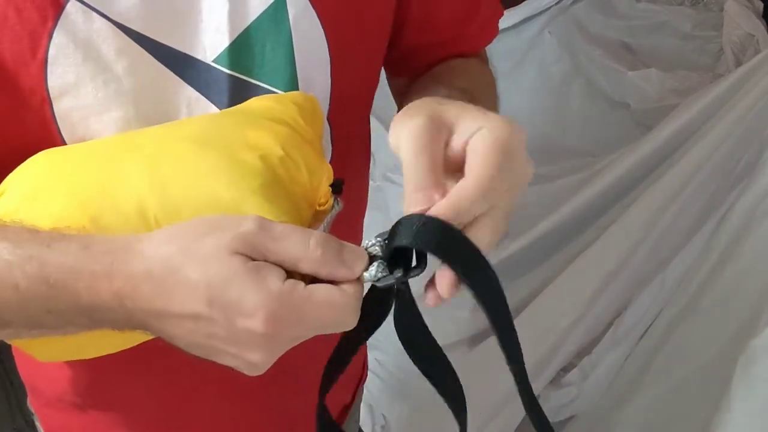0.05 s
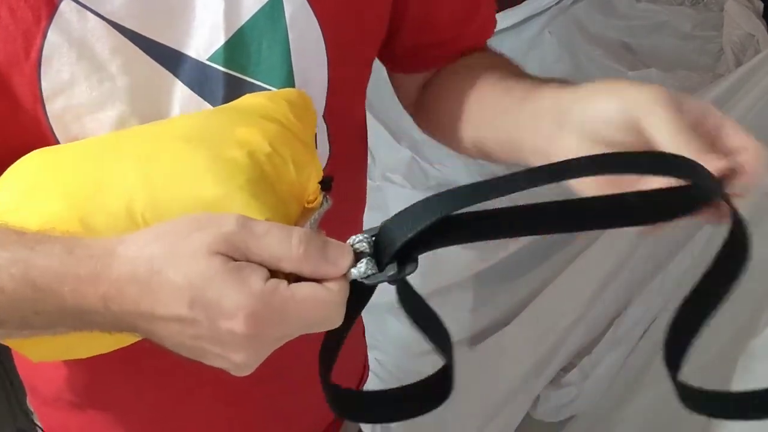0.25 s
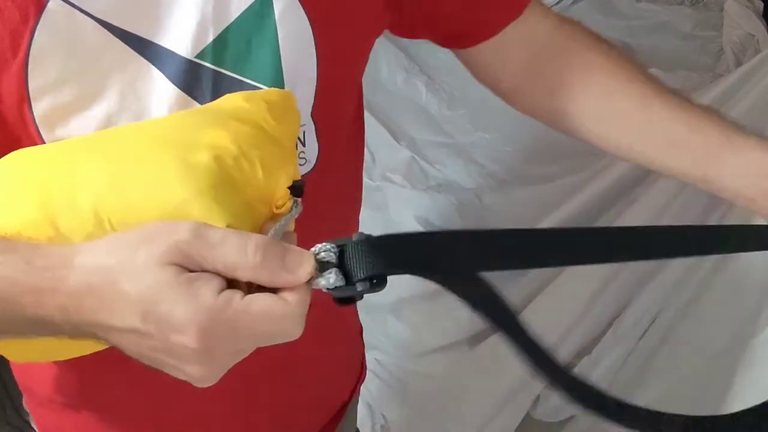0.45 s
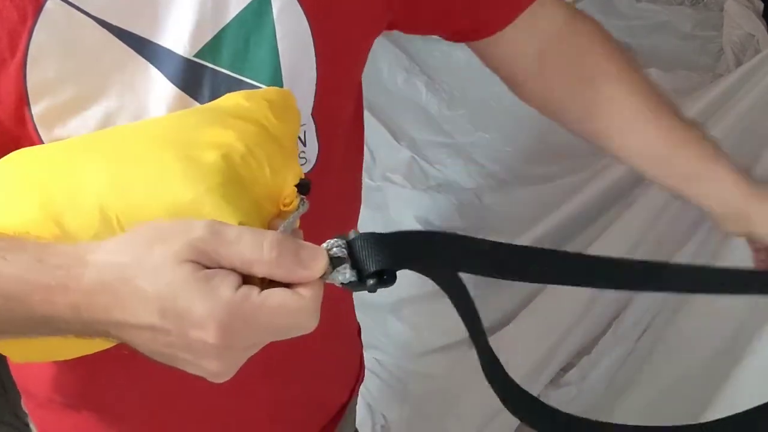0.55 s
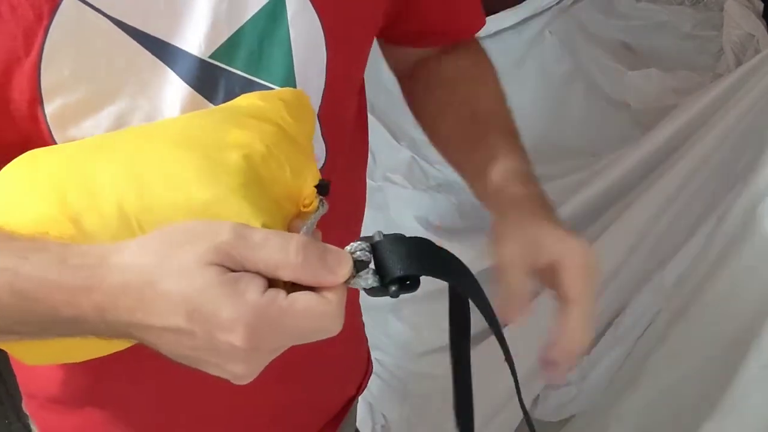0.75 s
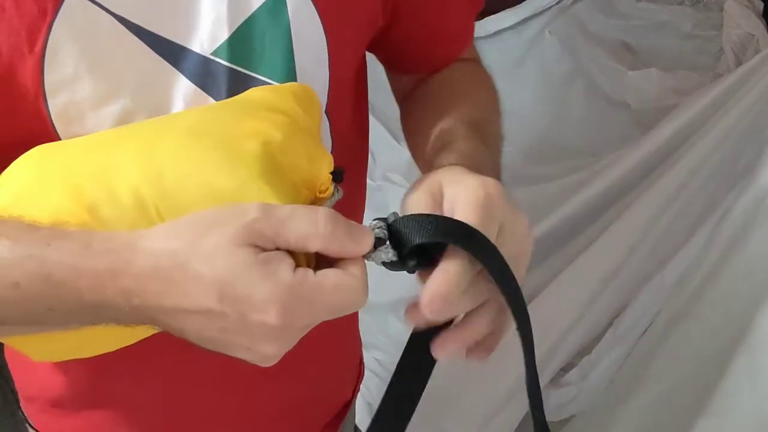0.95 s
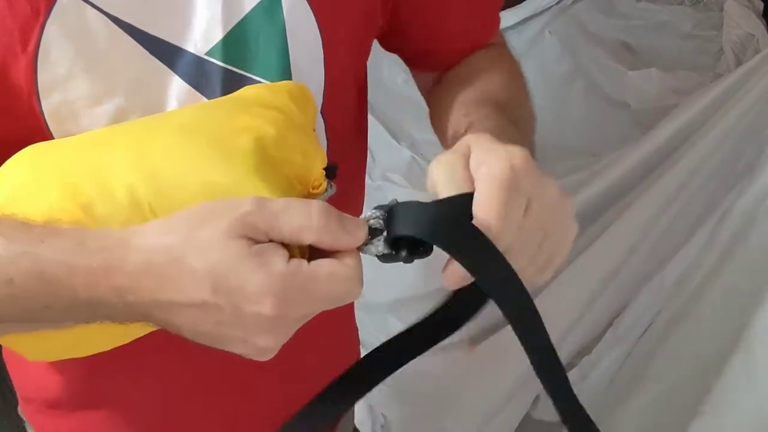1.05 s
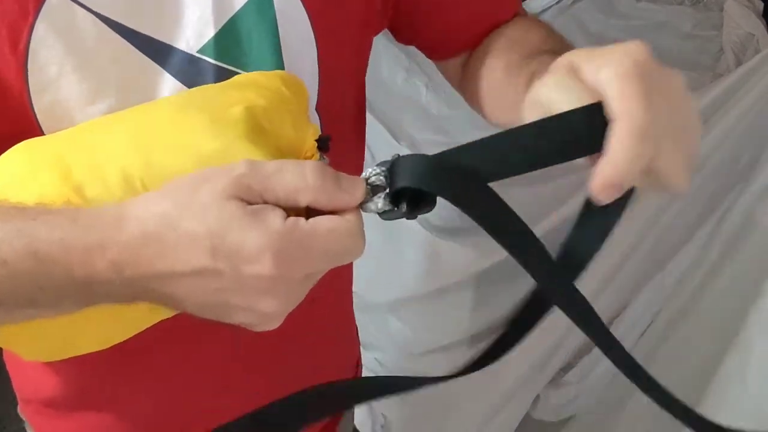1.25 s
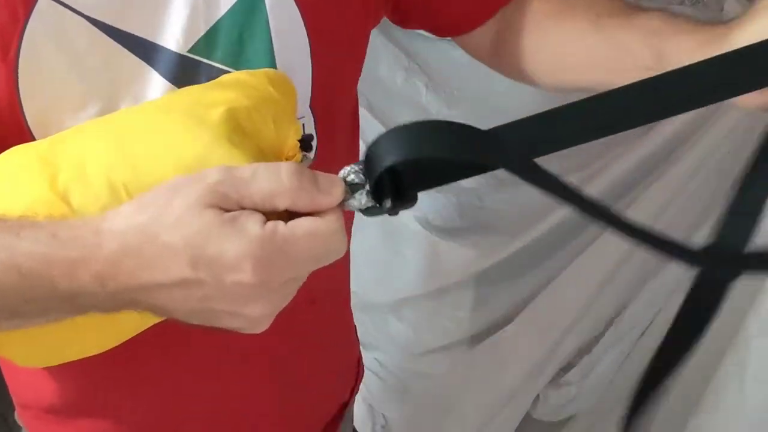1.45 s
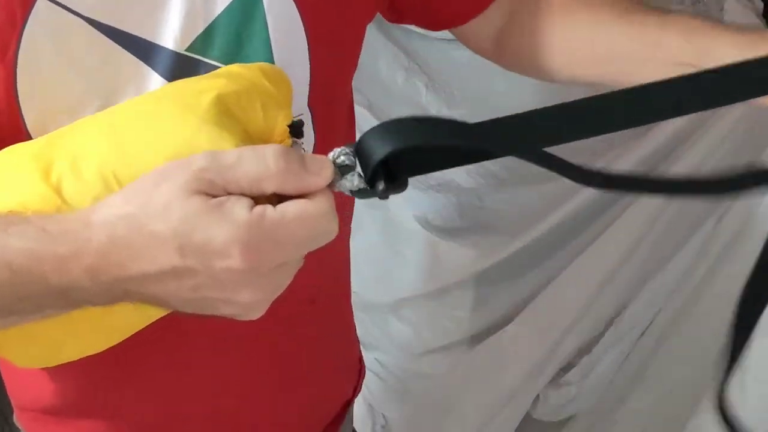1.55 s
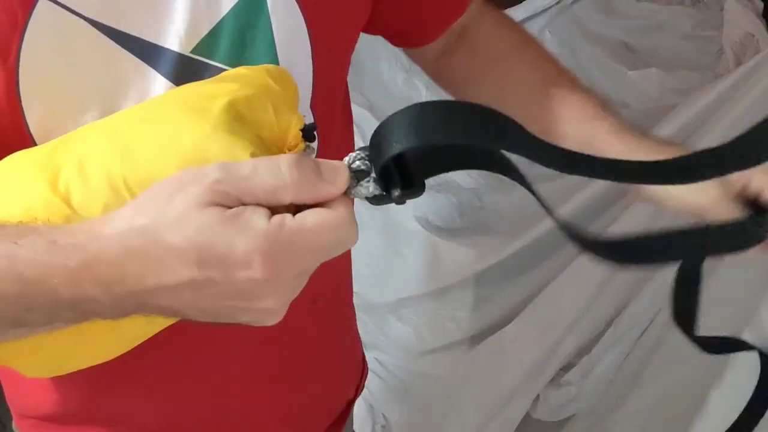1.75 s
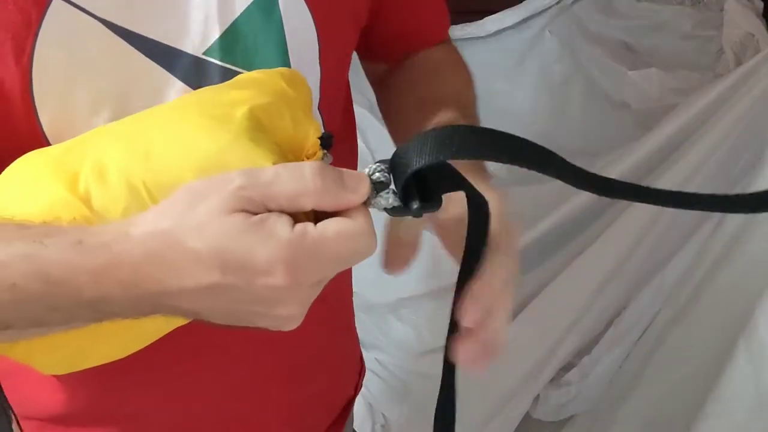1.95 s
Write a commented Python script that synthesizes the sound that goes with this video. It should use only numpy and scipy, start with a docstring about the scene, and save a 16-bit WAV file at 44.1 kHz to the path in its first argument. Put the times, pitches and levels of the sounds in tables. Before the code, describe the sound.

Close up in a quiet room, a nylon strap zips quickly through a metal buckle, ending in a sharp metallic snap. After a light rustle, a second pull buzzes lower until the strap cracks taut and flaps slack.

```python
"""Nylon webbing is pulled twice through a metal cam buckle, close by in a quiet room.
After light handling ticks, the ribs of the weave buzz over the cam at a pitch that follows the hand's
speed, while the fibres hiss. Near 0.6 s the buckle chatters, snaps shut and rings. Cloth rustles as the
hand takes a new grip. From 1.2 s a slower pull buzzes lower, ending near 1.65 s in a crack, a dull tug
and a flap of slack strap."""
import sys
import numpy as np
from scipy import signal
from scipy.fft import rfft, irfft, next_fast_len
from scipy.io import wavfile
from scipy.ndimage import uniform_filter1d, map_coordinates

SR = 44100
rng = np.random.default_rng(int(sys.argv[2]) if len(sys.argv) > 2 else 0)


def digitize_waveform(pressure):
    """Quantize a signal to 16-bit integers and store it at the path in sys.argv[1].

    Rows of a 2-D input are taken as channels; values are limited to [-1, 1].
    """
    field = np.atleast_2d(pressure).T
    bounded = np.clip(field, -1, 1)
    quanta = np.round(bounded * 32767).astype(np.int16)
    wavfile.write(sys.argv[1], SR, quanta)


N = 88200
T = np.arange(N) / SR

# room rumble, and its side channel relative to the mid (frequency [Hz], level [dB])
RUMBLE_COLOUR = [(25, -48), (45, -11.5), (60, -11.5), (100, -0.5), (150, -8), (380, -20.5), (700, -19.5),
                 (950, -27), (3000, -33), (9000, -51)]
RUMBLE_SIDE = [(60, -36), (130, -5), (300, -12), (2000, 0.5)]
# reverberation time (frequency [Hz], t60 [s])
ROOM_DECAY = [(200, 0.2), (14000, 0.074)]

# handling ticks, rustle envelope and flaps of slack strap (time [s], relative level [dB])
TICKS = [(0.07, -45), (.1213, -43), (0.1344, -39), (0.675, -44), (0.9627, -33), (1.058, -47.5)]
RUSTLE = [(0, -79), (.12, -68.5), (.62, -61.5), (.72, -78), (.89, -76), (.95, -63), (1.04, -67),
          (1.08, -61.5), (1.9, -65.5), (2, -68.5)]
FLAPS = [(.563, -41), (1.667, -41), (1.678, -37), (1.69, -36), (1.716, -36), (1.75, -41.5)]
# their spectra (frequency [Hz], level [dB])
TICK_COLOUR = [(1000, -15), (1700, 4), (4700, 6), (7400, 4.5), (9500, -7), (15800, -9)]
RUSTLE_COLOUR = [(400, -14), (2000, 4.5), (4000, 4.5), (10000, -2.5), (13500, 1), (15800, -8)]
FLAP_COLOUR = [(40, -21), (100, 5.5), (270, 2), (420, -11.5), (8000, -68)]
# the strap cracking taut, shuddering and scraping when slack (frequency [Hz], level [dB])
CRACK_COLOUR = [(800, -18), (1550, -2), (2380, -7), (3050, 5.5), (3600, -14), (4200, 6), (4700, -10),
                (15800, -45)]
TUG_COLOUR = [(200, -15), (950, -5), (1300, 6), (3150, -6), (3600, -17), (15800, -35)]
SLACK_COLOUR = [(100, -42), (270, 5.5), (480, -12), (740, 10.5), (1100, 0), (3000, -23)]
# fibres snagging on the cam (time [s], level [dB])
SNAGS = [(.16, -52), (0.2332, -42.5), (0.2743, -38.5), (0.532, -44.5)]

# modes of the steel buckle (frequency [Hz], level [dB], t60 [s])
STEEL_MODES = [(5280, 1, 0.099), (5529, -9, 0.097), (6130, -13, 0.15), (6982, 4, .16), (7290, 13.5, 0.11),
               (7850, -7, .17), (12100, -9, 0.087)]
# the cam's impacts (time [s], level [dB], loss above 6 kHz [dB/octave])
SNAPS = [(0.5784, -35, -5), (0.5874, -3.5, -0.5), (0.5905, -14.5, 0), (0.5925, -14.5, 1), (0.596, -17.5, 4)]
# envelope of the loose cam's rattle (time [s], level [dB])
CHATTER = [(.52, -68), (.544, -45), (.57, -45.5), (.59, -40), (.615, -59), (.635, -61), (.66, -77)]
# spectra of impact and rattle (frequency [Hz], level [dB])
SNAP_COLOUR = [(200, -37), (1800, -11), (3600, -17), (4600, -2.5), (5500, 4.5), (7400, 1.5), (8900, -13),
               (10500, -3), (11800, 3), (13500, -5.5), (15800, -6)]
CHATTER_COLOUR = [(1000, -37), (4000, -6.5), (6200, 1.5), (7700, -2.5), (8800, -14), (15800, -5)]

# speed of each pull (time [s], rib rate [Hz])
RIB_RATE_1 = [(.14, 205), (.2, 321), (.24, 444), (.265, 440), (.28, 593), (.305, 590), (.385, 850),
              (.407, 1000), (.425, 903), (.455, 995), (.5, 970), (.53, 655), (.555, 354), (.585, 232)]
RIB_RATE_2 = [(1.2, 114.6), (1.28, 246), (1.31, 349.8), (1.345, 396.7), (1.37, 526), (1.386, 504.4),
              (1.408, 549), (1.428, 501.7), (1.458, 497), (1.475, 424.4), (1.53, 484.4), (1.55, 575.5),
              (1.58, 526.7), (1.612, 445.8), (1.635, 290.3), (1.665, 176.3), (1.7, 99.3)]
# envelopes of each pull (time [s], relative buzz level [dB], relative hiss level [dB])
LEVELS_1 = [(0.101, -103, -64.5), (.16, -59, -68), (.215, -57, -55.5), (.238, -49.5, -55.5),
            (.262, -51.5, -51.5), (0.286, -46, -48.5), (.32, -44, -49.5), (0.383, -50, -52.5),
            (0.404, -43.5, -49.5), (0.424, -39.5, -43.5), (0.446, -50.5, -33), (.475, -47.5, -47.5),
            (0.509, -52, -53.5), (.535, -45.5, -59), (0.584, -45, -46), (.61, -94, -72)]
LEVELS_2 = [(1.15, -65.5, -74.5), (1.215, -63.5, -58), (1.262, -52.5, -55.5), (1.295, -52, -49.5),
            (1.32, -47.5, -51), (1.36, -44.5, -48), (1.37, -38, -47), (1.408, -38.5, -49.5),
            (1.428, -41, -48.5), (1.448, -36.5, -49.5), (1.472, -42.5, -50), (1.54, -41.5, -52.5),
            (1.555, -40.5, -49.5), (1.625, -42, -52), (1.641, -36.5, -56), (1.668, -42.5, -83),
            (1.731, -91, -91)]
# partials of the buzz (frequency [multiple of rib rate], level [dB])
PARTIALS_1 = [(1, 1.5), (1.5, -5.5), (2, 4), (2.5, -5), (3, -2), (3.5, -9), (4, -2), (6, -3.5)]
PARTIALS_2 = [(.5, -14.5), (1, -0.5), (1.5, -11), (2, 3), (3, 2), (4, -5), (5, -6)]
# spectra of rib rasp and fibre hiss (frequency [Hz], level [dB])
RASP_1 = [(150, -7), (400, -4.5), (540, -17), (700, -6), (1000, -11), (1180, -1.5), (1600, -0.5),
          (2550, -4.5), (3000, -1.5), (4000, -6), (4700, -14), (8000, -14.5), (15000, -23)]
RASP_2 = [(100, -9), (300, 1.5), (510, -2), (610, -6.5), (760, 4), (900, -7.5), (1200, -6), (1550, 2.5),
          (2000, -4.5), (2700, -2), (4200, -13.5), (5500, -26), (15000, -39)]
HISS_1 = [(500, -25), (2500, 0.5), (4200, 7), (5800, 9.5), (7400, -4), (9000, -7), (12000, -5.5),
          (15800, -9)]
HISS_2 = [(500, -19), (2500, -6.5), (4300, 6.5), (5800, -1), (7300, -2), (9000, -9.5), (13000, -6.5),
          (15800, -6.5)]
# at speed the ribs catch evenly and the tone gains on the rasp (start [s], end [s], lift [dB])
EVEN_1 = (0.382, 0.477, 5.1)
EVEN_2 = (1.364, 1.463, 4.96)


def amp(db):
    """Amplitude ratio of a level in decibels."""
    return 10 ** (np.asarray(db) / 20)


def unit(x):
    """Normalisation to rms 1."""
    return x / np.sqrt(np.mean(x ** 2) + 1e-20)


def along(points, hz):
    """Interpolation on a logarithmic frequency axis."""
    f, values = np.transpose(points)
    return np.interp(np.log(hz + 1), np.log(f + 1), values)


def curves(rows):
    """Linear interpolation in time, one curve per value column."""
    times, *columns = np.transpose(rows)
    return [np.interp(T, times, column) for column in columns]


def wobble(rate):
    """Smooth random modulation, rate knots a second."""
    return map_coordinates(rng.standard_normal(8000), [T * rate], mode="wrap")


def filtered(x, response):
    """Filtering as multiplication of the spectrum by a frequency response."""
    size = next_fast_len(N + SR // 2)
    return irfft(rfft(x, size) * response(np.fft.rfftfreq(size, 1 / SR)), size)[..., :N]


def impulse(colour, size=2048):
    """Minimum-phase impulse response of energy 1, from the folded cepstrum."""
    cepstrum = irfft(np.log(amp(along(colour, np.fft.rfftfreq(size, 1 / SR)))))
    cepstrum[1:size // 2] *= 2
    cepstrum[size // 2 + 1:] = 0
    response = irfft(np.exp(rfft(cepstrum)))
    return response / np.linalg.norm(response)


def coloured(x, colour):
    """Convolution with a causal filter of the given spectrum."""
    return signal.fftconvolve(x, impulse(colour))[:N]


def grains(colour, spiky_db):
    """Friction noise of rms 1: many tiny slips of uneven size."""
    return unit(coloured(rng.standard_normal(N) * amp(spiky_db * wobble(1500)), colour))


def contact(s, colour, scuff, scuff_s):
    """Impact excitation: a sharp push and a short scuff, with the energy of a clean tick of peak 1."""
    age = np.maximum(T - s, 0)
    force = scuff * rng.standard_normal(N) * (age > 0) * np.exp(-age / scuff_s)
    force[round(s * SR)] += 1
    sound = coloured(force, colour)
    return sound / np.linalg.norm(sound) / np.abs(impulse(colour)).max()


def jerk(s, rise_s, fall_s):
    """Transient envelope of peak 1: quick rise, exponential decay."""
    age = np.maximum(T - s, 0)
    shape = (1 - np.exp(-(age / rise_s) ** 2)) * np.exp(-age / fall_s)
    return shape / shape.max()


def placed(x, lead_s, pan_db):
    """Time and level differences: the sound reaches the left channel earlier, and louder by pan_db."""
    sign = np.array([[1], [-1]])
    return filtered(x, lambda f: np.exp(1j * np.pi * f * lead_s * sign)) * amp(sign * pan_db / 2)


def background(rumble_db=-54, hum_hz=86, hum_db=-61.5):
    """Ambient noise: partly coherent room rumble and a faint hum wavering by phase modulation."""
    mid, side = filtered(rng.standard_normal((2, N)), lambda f: amp(along(RUMBLE_COLOUR, f)))
    side = filtered(side, lambda f: amp(along(RUMBLE_SIDE, f)))
    hum = np.sqrt(2) * np.sin(2 * np.pi * hum_hz * T + 0.69 * wobble(9.6))
    return amp(rumble_db) * unit(np.array([mid + side, mid - side])) + amp(hum_db) * hum


def reflections(x, wet_db, near_db, near_s):
    """Early reflections off hands and body, then a furnished room's exponential tail, as mid and side."""
    hz, t, noise = signal.stft(rng.standard_normal((2, SR // 4)), SR, nperseg=256)
    decay = amp(-60 * t / along(ROOM_DECAY, hz)[:, None])
    tail = signal.istft(noise * decay, SR, nperseg=256)[1]
    near = rng.standard_normal(tail.shape) * np.exp(-T[:tail.shape[1]] / near_s)
    response = amp(wet_db) * tail / np.linalg.norm(tail[0])
    response += amp(near_db) * near / np.linalg.norm(near[0])
    delayed = np.pad(x, (30, 0))
    return signal.fftconvolve(delayed[None], response, axes=1)


def room(x, wet_db, near_db, near_s, coherent_below_hz=990):
    """Time-varying reverberation: the reflections keep changing as arm and strap move."""
    hop = SR // 14
    window = np.sin(np.pi * np.arange(2 * hop) / (2 * hop))
    x, wet = np.pad(x, (hop, 2 * hop)), np.zeros((2, N + SR))
    for i in range(0, N + hop, hop):
        part = reflections(x[i:i + 2 * hop] * window, wet_db, near_db, near_s)
        wet[:, i:i + part.shape[1]] += part
    mid, side = wet[:, hop:hop + N]
    side = filtered(side, lambda f: f / np.hypot(f, coherent_below_hz))
    return np.array([mid + side, mid - side]) / np.sqrt(2)


def handling():
    """Light impacts and friction: the buckle ticks and cloth rustles as the hand takes a grip."""
    ticks = sum(amp(db) * contact(s, TICK_COLOUR, scuff=0.38, scuff_s=0.0037) for s, db in TICKS)
    rustle = amp(curves(RUSTLE)[0]) * grains(RUSTLE_COLOUR, spiky_db=2)
    return amp(8) * ticks + rustle


def snags():
    """Stick and slip: snagged fibres tear free in short scratches."""
    envelope = sum(amp(db) * jerk(s, rise_s=0.0008, fall_s=0.006) for s, db in SNAGS)
    return envelope * grains(HISS_1, spiky_db=3.5)


def strap():
    """Tension transients: the strap cracks taut and shudders on the second pull, and flaps after both."""
    crack = amp(-24.5) * jerk(1.633, rise_s=0.0006, fall_s=0.0031) * grains(CRACK_COLOUR, spiky_db=-0.5)
    tug = amp(-34.5) * jerk(1.636, rise_s=0.002, fall_s=0.013) * grains(TUG_COLOUR, spiky_db=2)
    flaps = sum(amp(db) * contact(s, FLAP_COLOUR, scuff=0.039, scuff_s=0.026) for s, db in FLAPS)
    return crack + tug + flaps


def ringing(x, ring_db):
    """Modal resonance: the struck steel rings on as a sum of damped sinusoids."""
    t = T[:SR // 3]
    ring = sum(amp(db - 60 * t / t60) * np.sin(2 * np.pi * (hz * t + rng.random()))
               for hz, db, t60 in STEEL_MODES)
    return x + amp(ring_db) * signal.fftconvolve(x, ring / np.linalg.norm(ring))[:N]


def buckle():
    """Impacts excite the steel's modes as the cam rattles, snaps shut and bounces."""
    snaps = np.zeros(N)
    for s, db, loss in SNAPS:
        colour = [(hz, level - loss * np.log2(max(hz / 6000, 1))) for hz, level in SNAP_COLOUR]
        snaps += amp(db) * contact(s, colour, scuff=0.066, scuff_s=0.0015)
    rattle = amp(curves(CHATTER)[0]) * grains(CHATTER_COLOUR, spiky_db=1.5)
    return ringing(snaps + rattle, ring_db=-19)


def rib_clicks(ribs, rate, scatter):
    """A jittered impulse train: each rib catches on the cam with uneven timing and strength."""
    jitter, strength = rng.standard_normal((2000, 2))[:int(ribs[-1])].T
    samples = np.interp(np.arange(len(jitter)) + scatter * jitter, ribs, np.arange(N)).astype(int)
    clicks = np.bincount(samples, amp(2.54 * strength), N) / np.sqrt(rate / SR)
    return clicks - uniform_filter1d(clicks, size=600)


def pull(rib_rate, levels, even, partials, rasp_colour, hiss_colour,
         tone_db, rasp_db, hiss_db, slack_db, waver, flutter_db, scatter):
    """Periodic excitation: ribs crossing the cam buzz and rasp at their rate and modulate fibre hiss."""
    rate, = curves(rib_rate)
    buzz_db, fibre_db = curves(levels)
    start, end, lift_db = even
    even_db = lift_db * uniform_filter1d(1. * (T > start) * (T < end), size=600)
    ribs = np.cumsum(rate * (1 + waver * wobble(250))) / SR  # ribs passed so far
    # as the hand slows, the strap slackens and its buzz turns to a scrape
    slowing_per_s = uniform_filter1d(np.maximum(-np.gradient(np.log(rate), T), 0), size=900)
    taut = 1 / np.hypot(1, slowing_per_s / 11.8)
    tone = np.zeros(N)
    for multiple, db in partials:
        gain = amp(db + along(rasp_colour, multiple * rate) + flutter_db * wobble(90))
        phase = 2 * np.pi * multiple * ribs + 0.28 * wobble(120)
        tone += taut ** max(multiple, 1) * gain * np.cos(phase)
    clicks = rib_clicks(ribs, rate, scatter)
    scrape = amp(slack_db) * (1 - taut) * unit(coloured(clicks, SLACK_COLOUR))
    rasp = np.sqrt(taut) * unit(coloured(clicks, rasp_colour))
    buzz = amp(tone_db + even_db) * tone + amp(rasp_db - even_db / 2) * rasp + scrape
    pulsing = 1 + 0.071 * np.cos(2 * np.pi * ribs)
    hiss = unit(grains(hiss_colour, spiky_db=1.5) * pulsing * amp(0.82 * wobble(54.75)))
    active = uniform_filter1d(1. * (T > levels[0][0]) * (T < levels[-1][0]), size=400)
    return active * (amp(buzz_db) * buzz + amp(fibre_db + hiss_db) * hiss)


def scene():
    """Superposition of webbing and buckle, direct and reflected, over the room's noise."""
    first = pull(RIB_RATE_1, LEVELS_1, EVEN_1, PARTIALS_1, RASP_1, HISS_1, tone_db=-1.5, rasp_db=-2.5,
                 hiss_db=1.5, slack_db=0.5, waver=0.012, flutter_db=3, scatter=0.13)
    second = pull(RIB_RATE_2, LEVELS_2, EVEN_2, PARTIALS_2, RASP_2, HISS_2, tone_db=-6, rasp_db=-1,
                  hiss_db=4, slack_db=0, waver=0.022, flutter_db=3.5, scatter=0.14)
    webbing = first + second + strap() + snags() + handling()
    metal = buckle()
    direct = placed(webbing, lead_s=0.0001, pan_db=2) + placed(metal, lead_s=0.00002, pan_db=0)
    reflected = room(webbing, wet_db=-10, near_db=-4, near_s=0.0023)
    reflected += room(metal, wet_db=-11.5, near_db=-5.5, near_s=0.007)
    return background() + reflected + direct


def record(dry):
    """Band limiting: an ideal low-pass filter at 16 kHz."""
    return filtered(dry, lambda hz: hz < 16000)


dry = scene()
out = record(dry)
digitize_waveform(out)
```